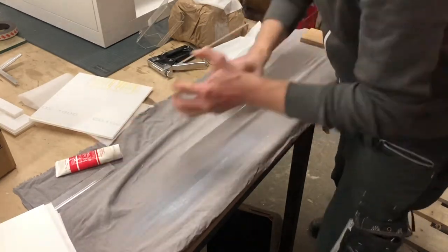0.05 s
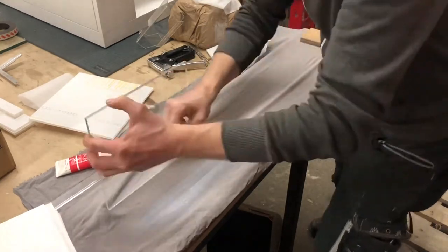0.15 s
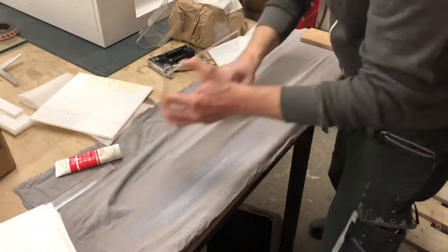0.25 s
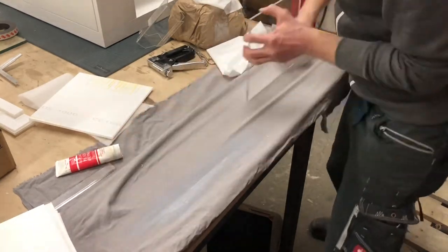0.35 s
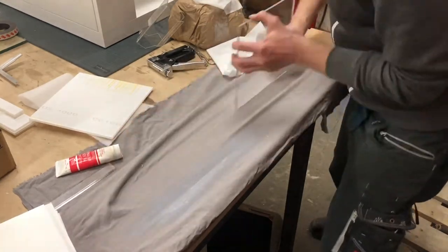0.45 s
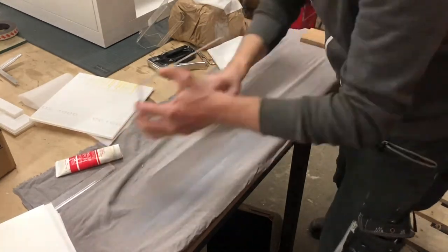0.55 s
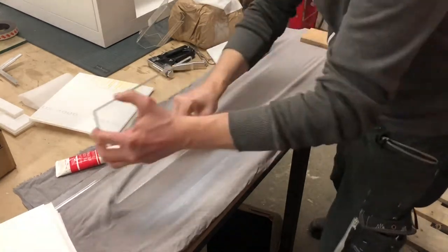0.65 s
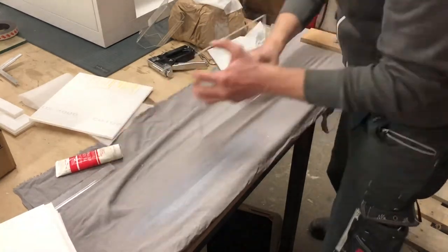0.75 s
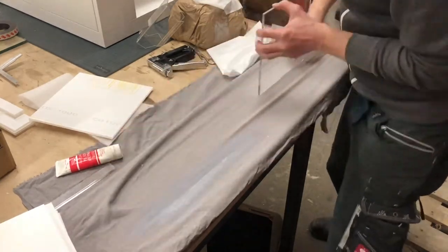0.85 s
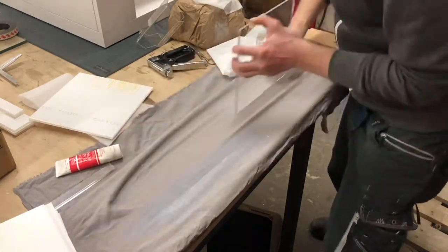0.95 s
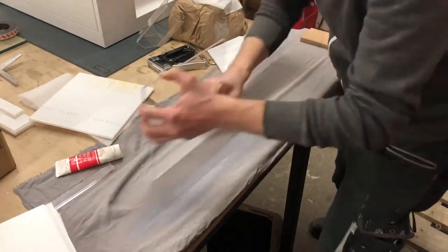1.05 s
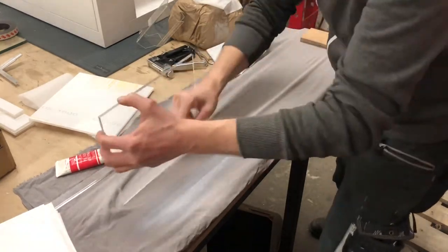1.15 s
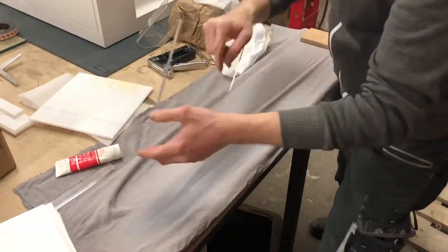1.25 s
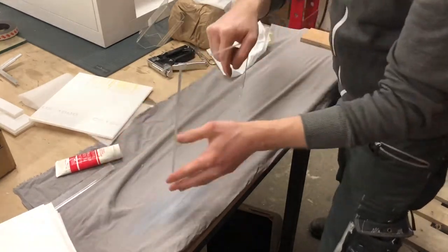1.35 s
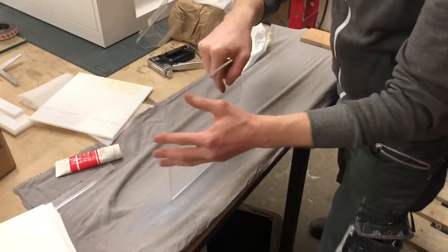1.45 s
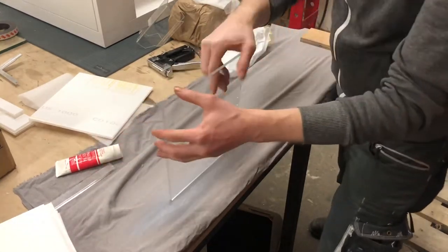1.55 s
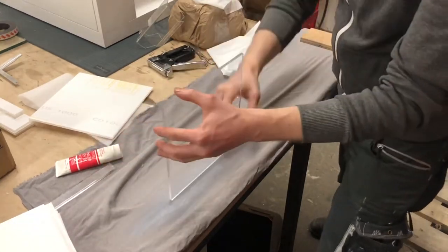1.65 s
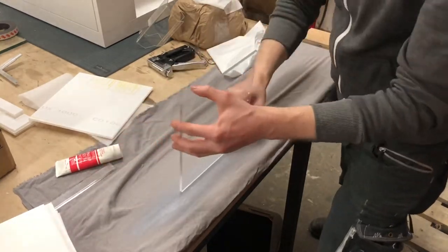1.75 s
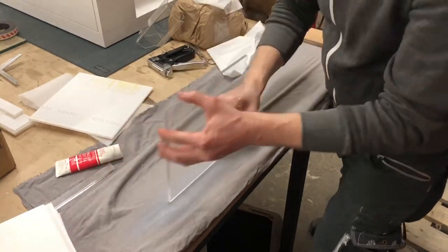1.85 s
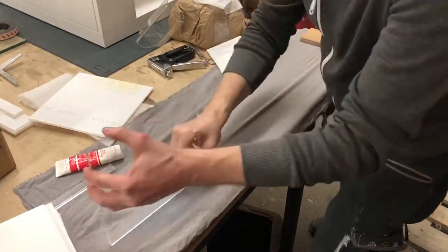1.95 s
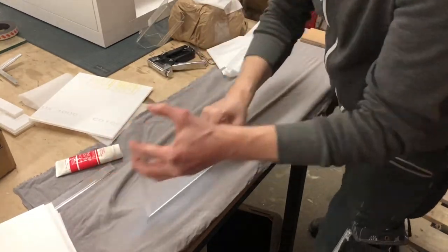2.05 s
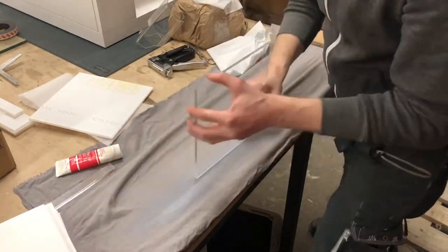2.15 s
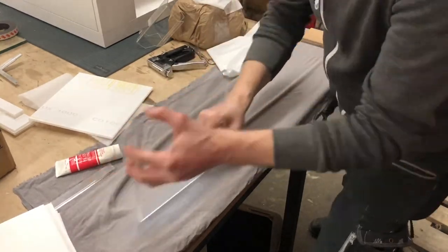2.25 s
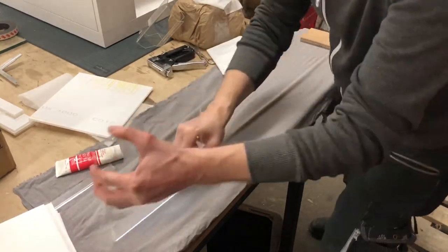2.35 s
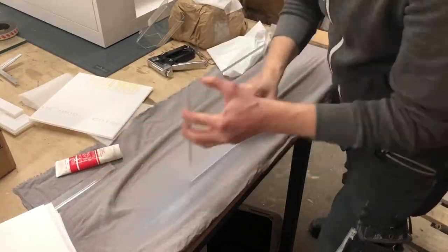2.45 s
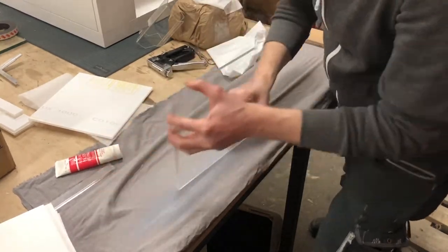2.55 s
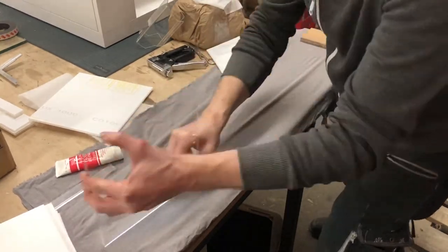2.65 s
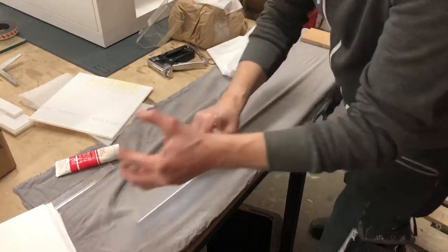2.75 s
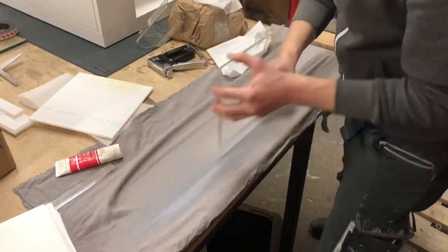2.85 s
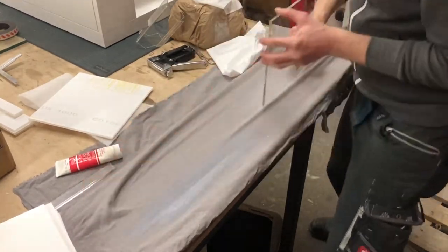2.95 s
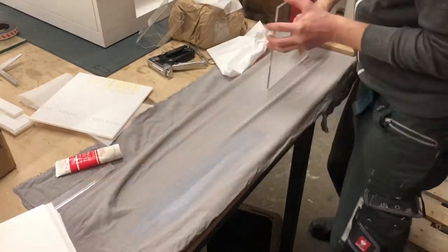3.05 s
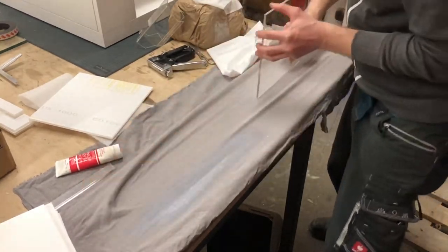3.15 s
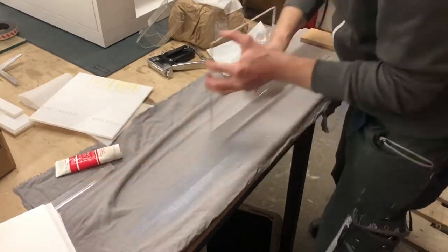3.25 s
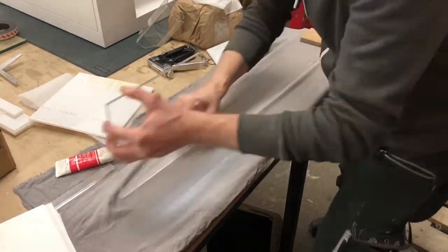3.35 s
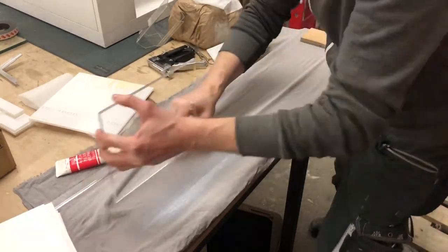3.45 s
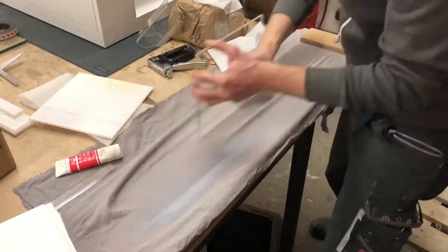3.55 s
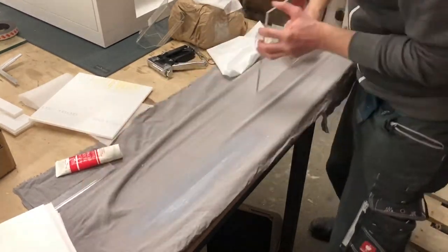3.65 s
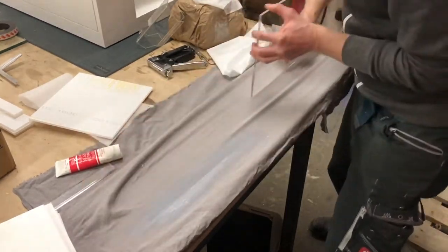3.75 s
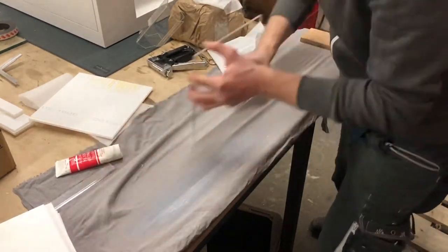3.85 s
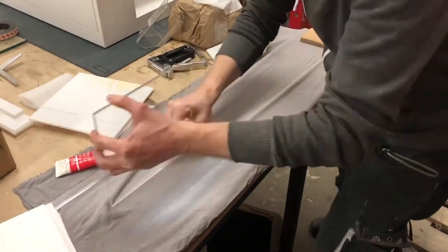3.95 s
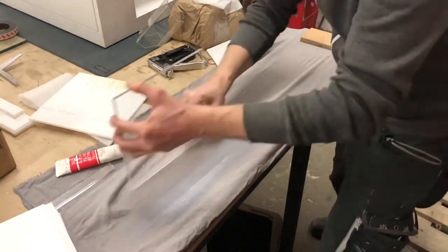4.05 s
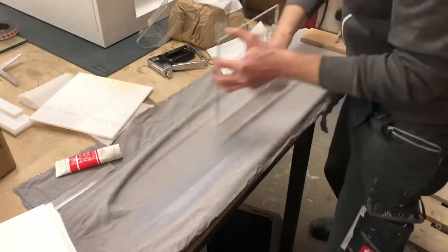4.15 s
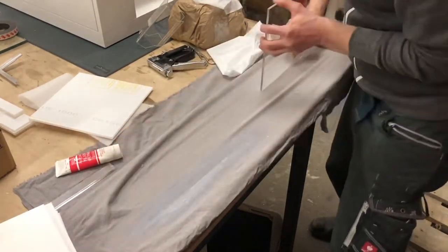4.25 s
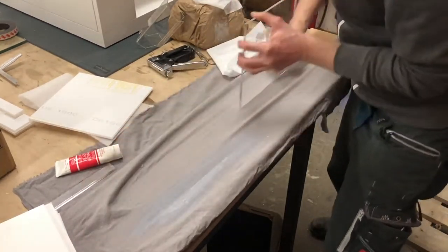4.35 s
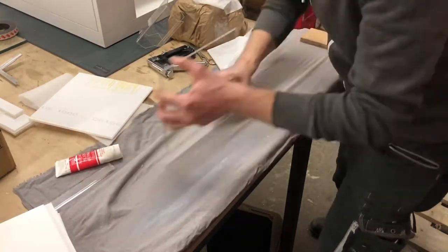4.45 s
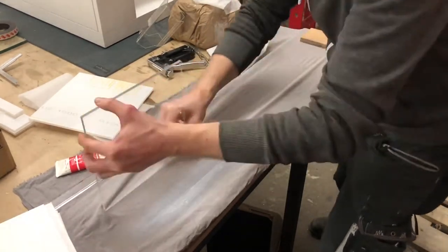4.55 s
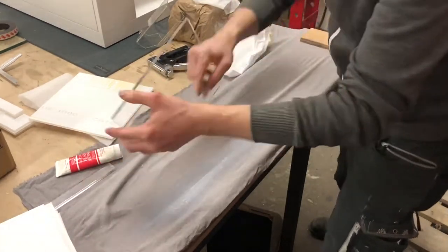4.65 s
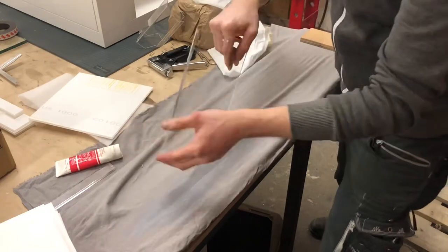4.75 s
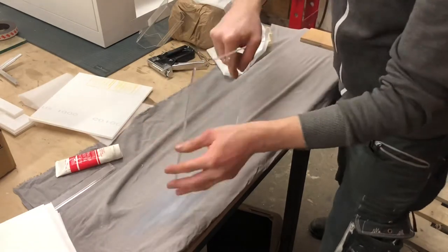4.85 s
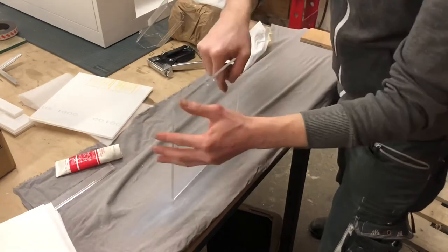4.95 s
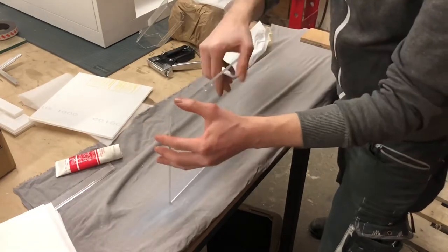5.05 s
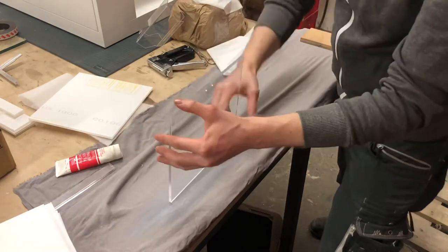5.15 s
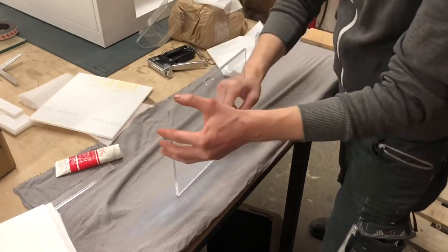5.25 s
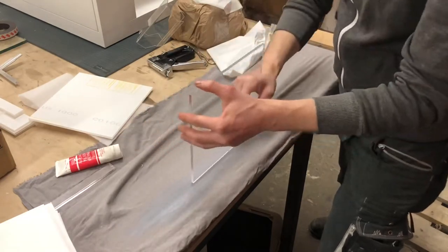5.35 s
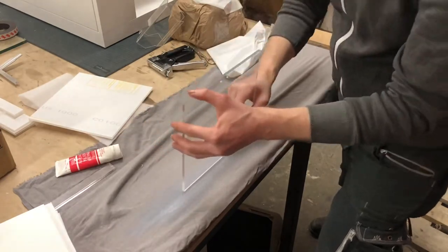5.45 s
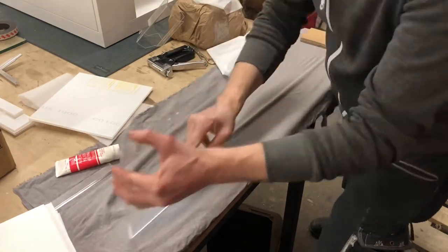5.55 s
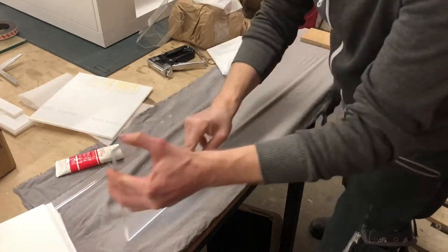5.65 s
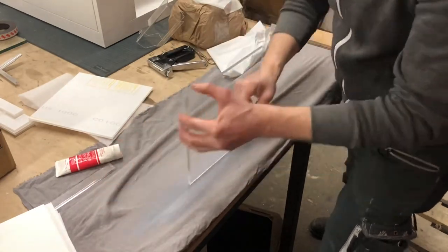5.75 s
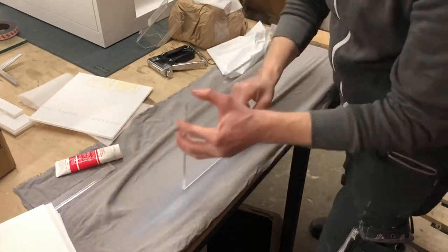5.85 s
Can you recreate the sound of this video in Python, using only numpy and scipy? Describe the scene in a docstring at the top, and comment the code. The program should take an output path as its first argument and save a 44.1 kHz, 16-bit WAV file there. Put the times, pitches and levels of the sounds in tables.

```python
"""A small workshop, one microphone close to the bench: an acrylic sheet's edge is polished on pasted cloth.
Five strokes open, the weave singing at a pitch that follows their speed, over rasping paste and hissing
fibres; the sheet thuds as they reverse. At 1.4 s it knocks on the bench, turned onto another edge, and a
longer run follows, rising in pitch near 3 s. Two loud knocks around 5 s lead into three last strokes.
The bench rumbles softly under the hands throughout."""
import sys
import numpy as np
from scipy import signal
from scipy.fft import rfft, irfft, next_fast_len
from scipy.io import wavfile
from scipy.ndimage import map_coordinates

SR = 44100
rng = np.random.default_rng(int(sys.argv[2]) if len(sys.argv) > 2 else 0)


def output_pcm(signal):
    """Save a mono or channel-first signal as 16-bit PCM at the path in sys.argv[1].

    Samples are clipped to [-1, 1] before scaling.
    """
    pcm = np.clip(np.atleast_2d(signal).T, -1, 1) * 32767
    wavfile.write(sys.argv[1], SR, np.round(pcm).astype(np.int16))


N = 260631

# Spectra of the paste's rasp and the fibres' hiss. Each row: frequency in Hz, relative level in dB.
PASTE_SPECTRUM = [(300, -40), (520, 0), (950, 0.5), (1100, -15), (1270, 9), (1450, -6), (1750, 0.5),
                  (2100, -3.5), (2450, -2.5), (2900, -5.5), (3600, -11.5), (4300, -19), (6000, -36),
                  (9000, -34)]
FIBRE_SPECTRUM = [(2500, -27), (4200, -4), (5000, -4.5), (6000, -10.5), (7000, -3), (7900, -0.5),
                  (8700, -2.5), (9600, -2), (10600, -2.5), (11400, 0), (12200, -2), (13100, -1.5),
                  (14300, -4), (15400, -2)]


def rubbing():
    """The edge drags over the cloth: the paste rasps, the fibres hiss and the passing threads sing."""
    # The weave's four voices. Each row: multiple of the thread rate, relative level in dB.
    groan_periods = [(.4, -2), (.6, -4.5)]
    tone_periods = [(1.01, 0), (2, -17)]
    whistle_periods = [(2.5, -15), (3.999, 16), (4.45, -15), (4.92, 3), (5.6, -24)]
    rib_periods = [(1.6, -1), (2.05, -4), (2.8, -9), (3.2, 1.5), (5.302, -2), (6.15, 0.5)]
    # The uneven pile at the reference thread rate. Each row: frequency in Hz, relative level in dB.
    pile_spectrum = [(250, -48), (800, -8), (1550, 1), (2350, -1.5), (2900, -1.5), (5000, -9.5),
                     (9000, -17)]
    reference_hz, full_glide_hz = 2500, 1500  # thread rates
    pile_db, song_db = 3, 5  # relative to the paste's steady rasp
    rate, rasp_gain, hiss_gain, (groan, tone, whistle, ribs) = strokes()
    threads = np.cumsum(rate) / SR
    # the edge reads the pile like a needle, so this part of the rasp rises and falls with the speed
    pile = noise(pile_spectrum, spiky_db=4)
    pile = map_coordinates(pile, [threads * SR / reference_hz], mode="mirror")
    glide = amp(pile_db) * np.clip(rate / full_glide_hz, 0, 1)
    groan, tone = amp(song_db) * groan, amp(song_db) * tone
    song = groan * weave(threads, groan_periods, blur=450)
    song += tone * weave(threads, tone_periods, blur=270)
    rasp = noise(PASTE_SPECTRUM, spiky_db=1.5) + sheet(glide * pile + song)
    rasp /= np.sqrt(1 + glide ** 2 + groan ** 2 + tone ** 2)
    # the finer periods of the weave whistle through the hiss
    treble = whistle * weave(threads, whistle_periods, blur=240)
    treble += ribs * weave(threads, rib_periods, blur=280)
    hiss = sheet(treble) + noise(FIBRE_SPECTRUM, spiky_db=2)
    hiss /= np.sqrt(1 + whistle ** 2 + ribs ** 2)
    uneven_grip = amp(wobble(60))  # about 1 dB deep
    return uneven_grip * (rasp_gain * rasp + hiss_gain * hiss)


def strokes():
    """Each stroke speeds up and slows like half a pendulum swing; speed sets thread rate and gains."""
    # Each row: start and end in seconds, peak thread rate in Hz, then in dB: rasp, hiss, the lean of
    # each (its rise from start to end), swell (how far the ends lie under the middle), clearness of song.
    passes = [(-.09, 0.101, 2473, -46.5, -48.5, -4, 3, 21.5, 4),
              (0.098, 0.334, 2492, -56.5, -54.5, -21, 8.5, 14, -5.5),
              (0.348, 0.578, 2487, -52, -51, 6, 2, 17, -0.5),
              (0.568, 0.816, 2440, -61, -56, -22, -2.5, 5, -5.5),
              (0.822, 1.083, 2300, -57, -50.5, 7, 3.5, 13.5, -1.5),
              (1.742, 1.927, 1997, -57.5, -57, -1, 1, 12, 2),
              (1.919, 2.102, 2527, -55, -58.5, -2, -7, 10.5, -4.5),
              (2.108, 2.271, 2512, -53, -61, 5, -16, 13, -1.5),
              (2.265, 2.429, 2468, -53.5, -61, 1, 3, 6.5, -9),
              (2.444, 2.618, 2540, -50.5, -59.5, 10.5, -12, 13, 0.5),
              (2.617, 2.881, 3017, -59, -59, -26, 1, 16.5, -3),
              (3.087, 3.352, 3405, -50.5, -49.5, 10, -4, 17, -0.5),
              (3.349, 3.631, 3578, -56, -59.5, -13, -5, 15.5, 0),
              (3.657, 3.939, 3293, -53, -55, 15, 5, 18.5, -1),
              (3.931, 4.214, 3597, -60.5, -59.5, -26.5, -20, 15.5, 0),
              (4.238, 4.524, 3442, -53, -49, 14, 3, 24, -1.5),
              (5.366, 5.568, 1970, -52, -58, 1, -11, 15, 11),
              (5.557, 5.748, 2285, -50.5, -60.5, 3, -7, 14, -9.5),
              (5.74, 5.944, 2060, -52, -62, 3, 8, 20, -0.5)]
    # The weave's voice changes between groups of strokes.
    # Each row: time in seconds from which it applies, then groan, tone, whistle and ribs in dB.
    voicings = [(-1, -32, 1.5, -6.5, 3.5), (1.24, -4, -3, -4.5, -9.5), (5, -3, -11.5, -10, -26),
                (5.5, -1, 3, -2, -26)]
    break_s, catch_s = 0.01, 0.026  # the edge breaks free quickly and catches again more gradually
    t = np.arange(N) / SR
    rate, rasp, hiss, voices = np.zeros(N), np.zeros(N), np.zeros(N), np.zeros((4, N))
    for start, end, peak_hz, rasp_db, hiss_db, rasp_lean_db, hiss_lean_db, swell_db, clear_db in passes:
        inside = (t >= start) & (t < end)
        progress = (t[inside] - start) / (end - start)
        speed = np.sin(np.pi * progress)
        sliding = np.clip(np.minimum((t[inside] - start) / break_s, (end - t[inside]) / catch_s), 0, 1)
        effort = sliding ** 2 * amp(-swell_db * (1 - speed))
        rate[inside] = peak_hz * speed
        rasp[inside] += effort * amp(rasp_db + rasp_lean_db * (progress - .5))
        hiss[inside] += effort * amp(hiss_db + hiss_lean_db * (progress - .5))
        _, groan_db, *song_db = [row for row in voicings if row[0] <= start][-1]
        # a clear stroke sings more and groans less
        voice_db = np.r_[groan_db - clear_db, np.add(song_db, clear_db)]
        voices[:, inside] = amp(voice_db)[:, None] * speed ** 0.88
    return rate, rasp, hiss, voices


def weave(threads, periods, blur):
    """Tones of passing threads; uneven spacing makes each a narrow band, roughly blur Hz wide."""
    bands = [amp(db) * (wobble(blur) + 1j * wobble(blur)) * np.exp(2j * np.pi * multiple * threads)
             for multiple, db in periods]
    return unit(np.sum(bands, axis=0).real)


def sheet(x):
    """Waves bounce between the sheet's edges: its dense modes blur the gliding tones and colour them."""
    # How well the sheet radiates. Each row: frequency in Hz, gain in dB.
    radiation = [(400, -5), (1000, -1.5), (1400, 0.5), (2000, 5.5), (2750, -3.5), (3600, 1), (4400, -8),
                 (5900, -6), (7700, -1.5), (10000, -2), (15000, -4)]
    t = np.arange(SR // 20) / SR
    bounces = rng.standard_normal(len(t)) * amp(-60 * t / .04)
    ring = .55 * bounces / np.linalg.norm(bounces)
    ring[0] += .83  # the direct wave
    return filtered(signal.fftconvolve(x, ring)[:N], lambda hz: amp(along(radiation, hz)))


def knocks():
    """Each contact sends a falling chirp through the bench and rings it; the cloth softens light ones."""
    # The sheet meets the bench. Each row: time in seconds, relative level in dB, hardness as cutoff in Hz.
    contacts = [(.090, -47, 710), (.327, -55.5, 790), (.563, -46.5, 650), (.806, -55.5, 715),
                (1.112, -53, 379.4), (1.358, -43, 353), (1.412, -34.5, 1960), (1.908, -54.5, 694),
                (2.083, -51.5, 765.5), (2.259, -47, 744.6), (2.429, -51, 703), (2.614, -49.5, 698.6),
                (2.663, -52.5, 596.5), (2.873, -57, 652), (3.013, -39, 834), (3.345, -47.5, 694),
                (3.582, -58.5, 563), (3.624, -55.5, 643), (3.927, -45.5, 650), (4.198, -54, 657.5),
                (4.53, -58.5, 403.8), (4.908, -28.5, 2060), (5.266, -27.5, 1810), (5.543, -51, 749)]
    # Each row: frequency in Hz, relative level in dB, seconds to fall 60 dB.
    bench_modes = [(212.8, 12, 0.16), (297.4, -3, 0.16), (650, -30, 0.11), (827, -5, 0.33), (856, 6, 0.1),
                   (968, -1, 0.24), (1310, -7, 0.21), (1410, -27, 0.13), (1470, -30, 0.18),
                   (1570, -14, 0.33), (1580, -33, 0.092), (1720, -12, 0.43), (1820, -17, 0.2),
                   (1980, -4, 0.23)]
    # The bench's colour. Each row: frequency in Hz, gain in dB.
    bench_response = [(30, -50), (80, -29), (115, -6), (150, -0.5), (205, 7), (250, -2.5), (300, 6.5),
                      (370, -1.5), (550, 5), (900, 3.5), (1120, -0.5), (1300, 5.5), (2000, 1), (2700, -7)]
    track, t = np.zeros(N), np.arange(SR // 2) / SR
    chirp = bending_wave(lag=.022)
    # the sheet itself claps straight into the air, without bass
    highpass = signal.butter(1, 900, "high", fs=SR, output="sos")
    clap = signal.sosfilt(highpass, signal.unit_impulse(len(t), SR // 1000))
    for start, db, hardness_hz in contacts:
        modes = sum(amp(level - 60 * t / t60) * np.sin(2 * np.pi * (hz * t + rng.random()))
                    for hz, level, t60 in bench_modes)
        modes *= 1 - np.exp(-t / 0.013)  # standing waves take a few crossings to build up
        ring = 0.13 * modes / np.linalg.norm(modes) + 1.06 * tail()
        ring += 1.8 * tail() * amp(-60 * t / 0.048)
        knock = signal.fftconvolve(ring, chirp)[:len(t)]
        knock[:len(chirp)] += 0.5 * chirp
        knock = filtered(knock + .9 * clap, lambda hz: amp(along(bench_response, hz)))
        knock = signal.sosfilt(signal.butter(3, hardness_hz, fs=SR, output="sos"), knock)
        add(track, start, 0.18 * amp(db) * unit(knock))
    return track


def bending_wave(lag):
    """An impulse after crossing the bench: treble arrives first, bass about lag seconds later."""
    hz = np.fft.rfftfreq(SR // 2, 1 / SR)
    delay = .0005 + lag * np.maximum(np.sqrt(200 / (hz + 30)) - .32, 0)
    return irfft(np.exp(-2j * np.pi * np.cumsum(delay) * hz[1]), SR // 2)[:SR // 10]


def clicks():
    """Short bright clicks and crackles, mostly at stroke reversals and on the two loud knocks."""
    # Each row: time in seconds, relative level in dB, resonance in Hz, seconds to fall 60 dB.
    bursts = [(.088, -43, 2150, 0.019), (.563, -48, 2403, .027), (1.110, -41, 7710, 0.015),
              (2.26, -47, 2200, 0.024), (2.432, -50, 1900, .025), (2.492, -55, 1993, 0.033),
              (2.839, -51.5, 3320, 0.052), (3.342, -48.5, 2500, 0.041), (3.929, -59, 2198, .025),
              (4.908, -56, 10200, 0.1), (5.267, -46, 5970, 0.052), (5.543, -45, 1878, 0.021),
              (5.78, -49, 1776, 0.031)]
    track, t = np.zeros(N), np.arange(SR // 8) / SR
    for start, db, centre_hz, t60 in bursts:
        def colour(hz):
            resonance = hz * centre_hz / (centre_hz ** 2 - hz ** 2 + .8j * hz * centre_hz)
            return resonance / (1 + (hz / (0.43 * centre_hz)) ** 2)
        crackle = filtered(rng.standard_normal(len(t)), colour)
        add(track, start, amp(db - 60 * t / t60) * unit(crackle))
    return track


def swishes():
    """Soft swishes of rubbing on cloth, between strokes, leading into them and in the pauses."""
    # Each row: middle and length in seconds, rasp and hiss in dB.
    swells = [(0.814, .05, -67, -72), (1.126, 0.036, -64, -60.5), (1.197, 0.04, -74, -61),
              (1.289, .005, -80, -70), (1.325, .01, -74, -72), (1.614, 0.0094, -76, -64.5),
              (1.641, 0.012, -69, -60.5), (1.669, 0.017, -66, -59.5), (1.71, 0.043, -74, -69),
              (2.789, 0.029, -73, -60), (3.088, .035, -77, -69), (3.66, .09, -64, -71),
              (4.237, 0.096, -72, -75), (4.55, 0.043, -62.5, -63.5), (4.59, 0.019, -76, -63),
              (4.729, 0.014, -61, -56), (4.865, 0.012, -80, -69), (5.15, 0.013, -85, -68),
              (5.204, .07, -75, -78), (5.36, .04, -68, -66)]
    t = np.arange(N) / SR
    rasp, hiss = sum(amp([[rasp_db], [hiss_db]]) * np.exp(-2 * ((t - middle) / length) ** 2)
                     for middle, length, rasp_db, hiss_db in swells)
    return rasp * noise(PASTE_SPECTRUM, spiky_db=5) + hiss * noise(FIBRE_SPECTRUM, spiky_db=3)


def squeals():
    """A slowly dragged edge faintly excites one narrow resonance of the sheet."""
    # Each row: middle and length in seconds, approximate pitch in Hz, relative level in dB.
    drags = [(2.788, 0.13, 2993, -72.5), (3.644, 0.11, 2840, -70.5)]
    track, t = np.zeros(N), np.arange(N) / SR
    for middle, length, pitch_hz, db in drags:
        swell = np.exp(-(2 * (t - middle) / length) ** 4)
        track += amp(db) * swell * weave(pitch_hz * t, [(0.99, 0)], blur=330)
    return track


def rumble():
    """The bench drums softly and unsteadily under the moving hands."""
    # Each row: time in seconds, relative level in dB.
    levels = [(0.0, -70), (1.74, -68.5), (2.37, -70), (2.63, -57), (2.86, -68.5), (3.42, -58.5),
              (4.03, -67.5), (4.74, -68.5), (5.12, -65), (5.91, -72)]
    # Each row: frequency in Hz, relative level in dB.
    spectrum = [(29, -75), (50, -38), (84, -18), (140, -7), (172, -16), (191, -3), (221, 2.5), (238, 0.5),
                (275, -7), (355, -3.5), (420, -7), (516, -5.5), (698, -12), (900, -12), (1170, -21.5),
                (1980, -120)]
    level_db = np.interp(np.arange(N) / SR, *np.transpose(levels)) + 1
    sway_db = 1.75 * wobble(24)
    return amp(level_db + sway_db) * noise(spectrum)


def tail():
    """The diffuse ring of bench and room, of energy 1: each frequency dies at its own speed."""
    # Each row: frequency in Hz, seconds to fall 60 dB.
    decay_times = [(100, 0.23), (260, 0.3), (700, 0.22), (1840, .2), (5000, 0.24), (14000, 0.12)]
    hz, t, bands = signal.stft(rng.standard_normal(SR // 2), SR, nperseg=256)
    decay = amp(-60 * t / along(decay_times, hz)[:, None])
    ring = signal.istft(bands * decay, SR, nperseg=256)[1][:SR // 2]
    return ring / np.linalg.norm(ring)


def room_tone():
    """The faint, steady noise of the workshop's still air."""
    # Each row: frequency in Hz, relative level in dB.
    spectrum = [(15, -67), (25, -40), (217, -1.5), (270, -25), (317, -0.5), (476, -21), (962, -22),
                (1100, -12.5), (1260, -13), (1940, -13.5), (5570, -22), (12900, -24), (16000, -26)]
    return amp(-70.5) * noise(spectrum)


def noise(spectrum, spiky_db=0):
    """Coloured noise of rms 1; spiky_db scatters the sizes of its tiny impulses."""
    impulses = rng.standard_normal(N) * amp(spiky_db * wobble(2000))
    return unit(filtered(impulses, lambda hz: amp(along(spectrum, hz))))


def wobble(rate):
    """A smooth random curve with rate knots a second."""
    return map_coordinates(rng.standard_normal(int(N * rate / SR) + 4), [np.arange(N) * rate / SR])


def filtered(x, response):
    """Pass x through a complex frequency response."""
    size = next_fast_len(len(x) + 8192)
    return irfft(rfft(x, size) * response(np.fft.rfftfreq(size, 1 / SR)), size)[:len(x)]


def along(points, hz):
    """Read (Hz, value) points on a log frequency axis."""
    point_hz, values = np.transpose(points)
    return np.interp(np.log(hz + 1), np.log(point_hz + 1), values)


def amp(db):
    """Decibels to gain."""
    return 10 ** (np.asarray(db) / 20)


def unit(x):
    """Scale to rms 1."""
    return x / np.sqrt(np.mean(np.abs(x) ** 2) + 1e-20)


def add(track, start, sound):
    """Mix a sound in at start seconds."""
    part = track[round(start * SR):][:len(sound)]
    part += sound[:len(part)]


def scene():
    """The polishing close up in mono, with a little of the room, over the bench and the still air."""
    near = rubbing() + swishes() + squeals() + clicks()
    room = signal.fftconvolve(near, tail())[:N]
    return (0.88 * near + amp(-9) * room + knocks() + rumble() + room_tone())[None]


def record(dry):
    """The microphone's channel passes nothing above its band limit."""
    top_hz = 15850
    return np.array([filtered(channel, lambda hz: hz < top_hz) for channel in dry])


dry = scene()
out = record(dry)
output_pcm(out)
```